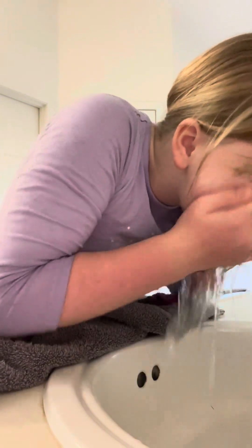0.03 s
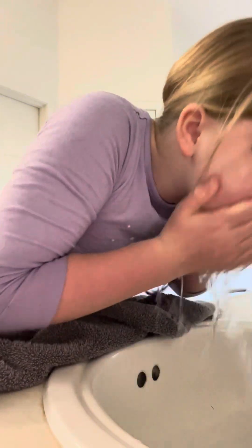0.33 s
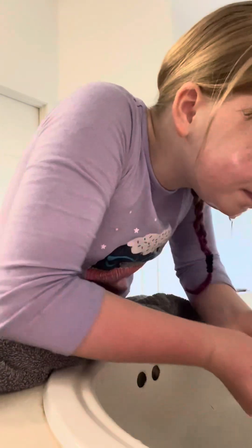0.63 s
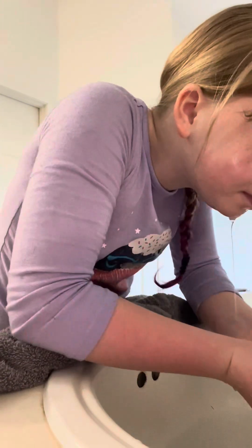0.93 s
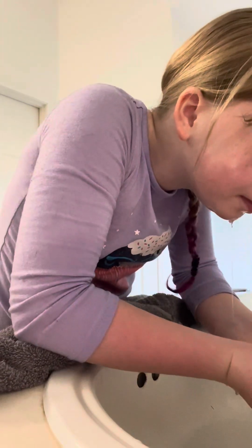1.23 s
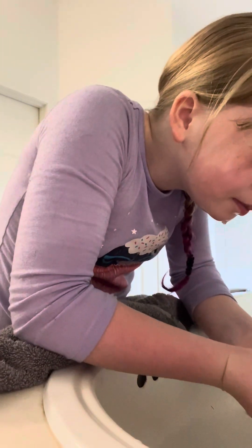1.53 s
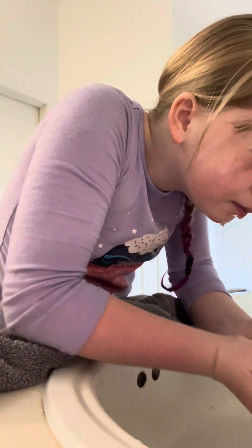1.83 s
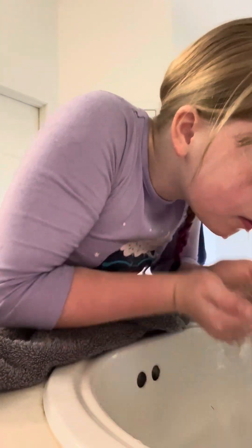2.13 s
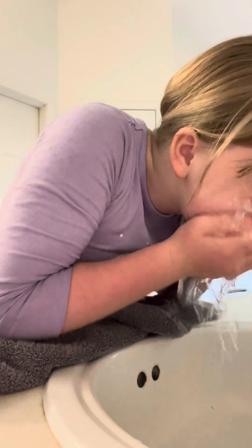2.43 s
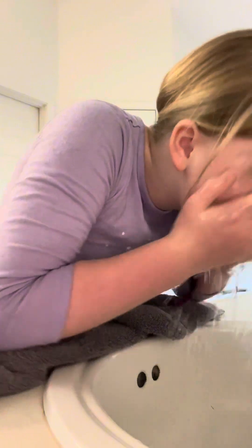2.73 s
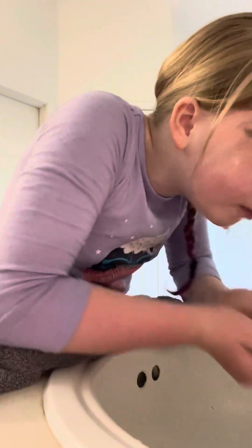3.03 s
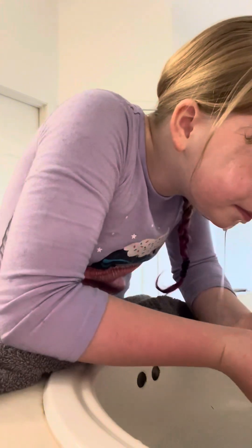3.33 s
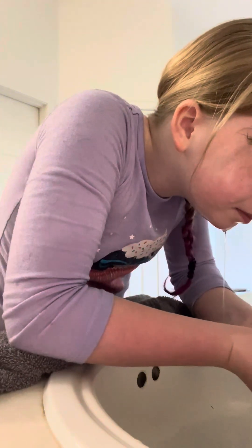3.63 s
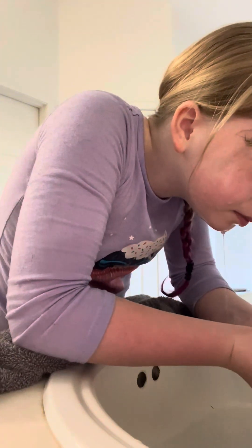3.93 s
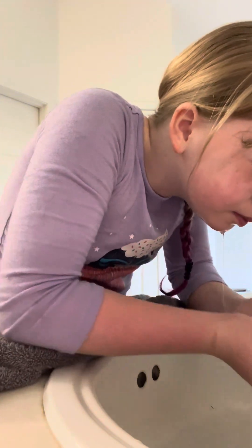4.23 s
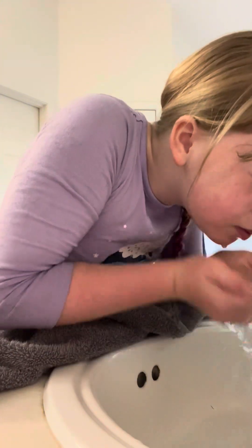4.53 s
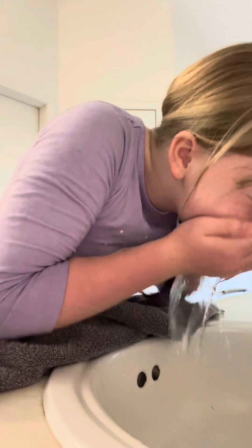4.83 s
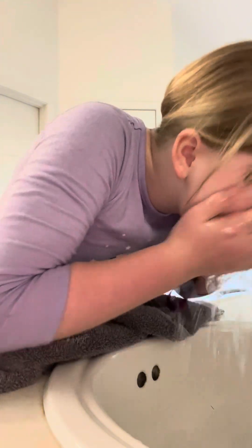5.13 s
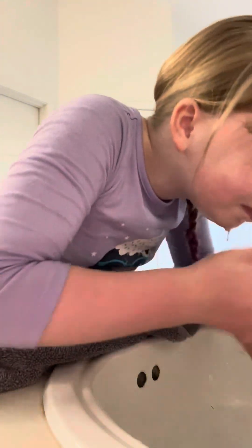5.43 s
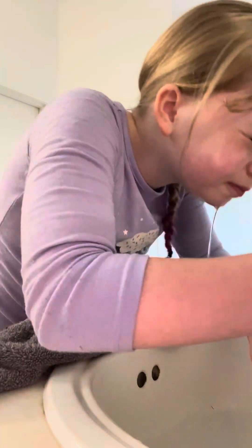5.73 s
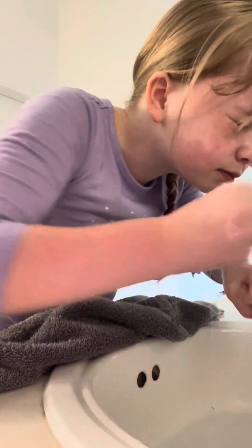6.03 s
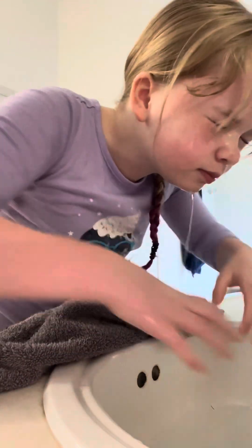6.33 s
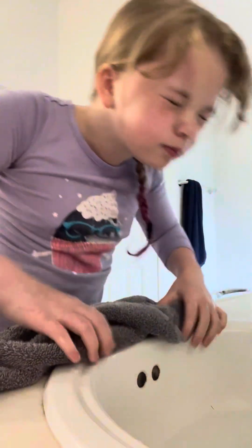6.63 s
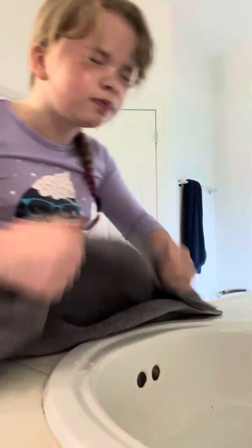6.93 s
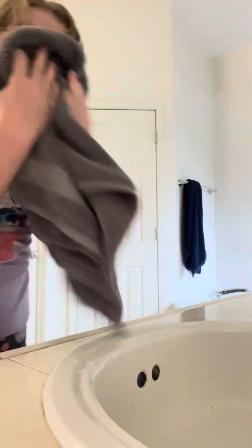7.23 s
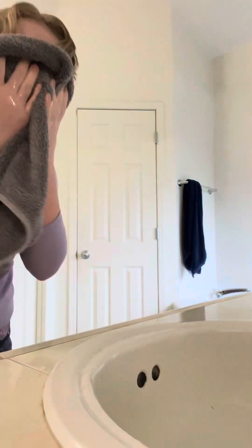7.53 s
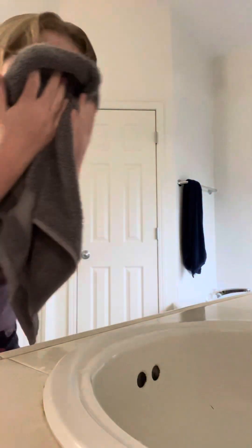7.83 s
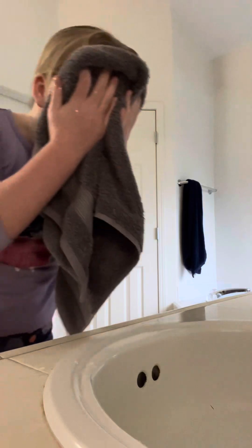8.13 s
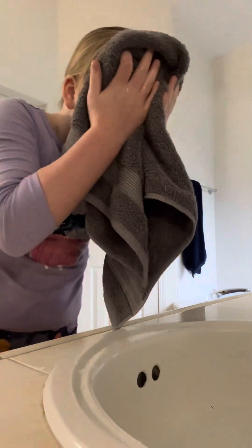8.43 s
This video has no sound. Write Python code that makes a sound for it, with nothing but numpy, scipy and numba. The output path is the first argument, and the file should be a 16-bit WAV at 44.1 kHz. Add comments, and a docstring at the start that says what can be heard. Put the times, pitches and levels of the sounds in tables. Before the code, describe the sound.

A tap runs into a sink as three handfuls of water splash a face, then it shuts off with a thump and a towel rubs.

```python
"""Washing a face at a basin

An aerated tap hisses into a bowl; three handfuls meet a face and fall back as spray and ringing bubbles.
The tap shuts with a heavy thump through the counter, the last water drains and drips, a towel rubs.
Heard from the rim in a small hard room, by two close microphone ports."""
import sys
import numpy as np
from scipy import signal
from scipy.fft import rfft, irfft
from scipy.io import wavfile
from numba import njit

SR = 44100
rng = np.random.default_rng(int(sys.argv[2]) if len(sys.argv) > 2 else 0)


def materialize(psi):
    """Save the field psi as 16-bit PCM at rate SR to the path in sys.argv[1].

    A 1-D psi becomes a single channel; in a 2-D psi each row is a channel.
    """
    bounded = np.clip(np.atleast_2d(psi).T, -1, 1)
    quanta = np.round(bounded * 32767).astype(np.int16)
    wavfile.write(sys.argv[1], SR, quanta)


N = 377937
TIME, HZ = np.arange(N) / SR, np.fft.rfftfreq(2 ** 19, 1 / SR)
TAP_SHUT_S, RUN_OFF_S = 5.732, 6.15

# Levels are relative, ahead of each source's gain.
# hands under the jet: under_s, lifted_s, overflow_db, spill_db
FILLS = [(0.599, 1.965, -33.5, -30.5), (3.122, 4.292, -36.5, -32)]
# handfuls falling from the face: centre_s, half_s, level_db, drain_db
SPLASHES = [(0.264, 0.37, -30, -34), (2.693, 0.37, -32, -32.5), (5.1, 0.24, -27, -32.5)]
# clouds of like-sized bubbles: centre_s, length_s, pitch_hz, level_db
SLOSHES = [(0.157, 0.11, 3400, -27.5), (0.288, 0.012, 3810, -25.5), (0.378, 0.037, 1917, -28),
           (2.403, 0.043, 1616, -31), (2.678, 0.051, 3570, -27), (2.839, 0.066, 2106, -24),
           (4.331, 0.015, 1556, -34.5), (4.422, 0.13, 3440, -33.5), (4.962, 0.033, 3400, -28.5),
           (5.253, 0.038, 1578, -26), (5.802, 0.013, 3314, -31.5), (6.16, 0.1, 4250, -51),
           (6.739, 0.052, 4520, -60.5)]
# single bubbles: start_s, level_db, pitch_hz
PLOPS = [(0.048, -11.5, 1580), (0.086, -22.5, 1060), (0.131, -10, 4180), (0.19, -11.5, 687),
         (0.232, -7.5, 1486), (0.316, -5, 4460), (0.347, -12.5, 1120), (0.348, -11.5, 2040),
         (0.376, -16.5, 1447), (0.471, -17, 730), (0.582, -18.5, 3930), (0.779, -16, 3650),
         (1.484, -19.5, 1420), (1.575, -20.5, 692), (1.604, -13, 6650), (1.711, -19, 1040),
         (1.777, -9.5, 4120), (1.81, -21.5, 720), (1.889, -18, 696), (1.965, -18.5, 725),
         (2.018, -9.5, 3700), (2.087, -9.5, 3359), (2.147, -12, 3700), (2.148, -17.5, 1248),
         (2.296, -16, 2070), (2.389, -15.5, 694), (2.401, -12.5, 1740), (2.547, -15.5, 2670),
         (2.613, -9.5, 1753), (2.676, -9, 6600), (2.714, -12.5, 3300), (2.768, -10, 1095),
         (2.807, -12.5, 2080), (2.871, -13, 2010), (2.894, -3.5, 1115), (3.113, -22, 674),
         (3.288, -21.5, 1055), (4.352, -16.5, 6000), (4.387, -19, 694), (4.427, -14, 1480),
         (4.455, -11, 4100), (4.492, -9.5, 5189), (4.866, -18, 1180), (4.925, -8.5, 1450), (4.973, 2, 3800),
         (4.974, -13.5, 1740), (5.052, -11, 1690), (5.09, -12.5, 1480), (5.11, -11, 734),
         (5.134, -13, 4100), (5.193, -15.5, 860), (5.233, -10.5, 6280), (5.258, -10.5, 1096),
         (5.743, -14, 1073), (5.775, -17, 2210)]  # large drops
GLUGS = [(0.056, -20, 474), (0.203, -26, 409), (0.498, -23, 474), (0.611, -21.5, 418), (2.197, -17.5, 411),
         (2.3, -21.5, 415), (2.345, -21.5, 427), (2.398, -24.5, 428), (2.503, -24.5, 456),
         (2.586, -24, 410), (2.627, -19.5, 410), (2.682, -25, 417), (2.913, -24.5, 435), (2.975, -17, 400),
         (3.029, -26, 406), (4.441, -17, 421), (4.479, -19, 415), (4.549, -23, 400), (4.572, -20.5, 406),
         (4.696, -21.5, 339), (4.722, -20, 416), (4.874, -21.5, 389), (4.923, -22.5, 395),
         (4.956, -15.5, 410), (5.06, -21, 468), (5.126, -20.5, 391), (5.16, -20.5, 432),
         (5.195, -16.5, 417), (5.25, -21, 463), (5.309, -22.5, 412), (5.347, -20, 408), (5.571, -21.5, 402),
         (5.595, -17.5, 419), (5.662, -15.5, 412)]  # in the drain
DRIPS = [(5.9075, -26.5, 1440), (5.925, -34, 5600), (5.9998, -29, 4240), (6.021, -29, 3770),
         (6.0412, -27, 2820), (6.056, -33.5, 2220), (6.0651, -28.5, 1375), (6.0911, -26.5, 1504),
         (6.134, -40, 4350), (6.162, -36.5, 3480), (6.2098, -25.5, 5600), (6.2287, -37, 1160),
         (6.7131, -42, 5380), (6.7775, -35, 2840)]  # after the tap shuts
# fine droplets on porcelain: start_s, level_db
SPATTERS = [(5.9424, -35), (5.9914, -29), (6.0282, -35), (6.0412, -45.5), (6.147, -40), (6.1894, -46),
            (6.2088, -41), (6.323, -44), (6.6578, -43), (6.695, -48), (6.7131, -47)]
# dull knocks on the counter, the loudest is the tap shutting: start_s, level_db, pitch_ratio
KNOCKS = [(5.615, -23.5, 0.76), (5.754, -4, 1), (6.916, -36.5, .9), (7.039, -44.5, .8), (7.143, -51, 0.92),
          (7.9, -47.5, 0.58)]
# counter modes: pitch_hz, level_db, t60_s
COUNTER_MODES = [(88.7, 12.5, 0.083), (91.7, -17, 0.46), (63.6, -11.5, 0.39), (138.3, -16, 0.4),
                 (230, -30, 0.21), (340, -30, 0.3), (491, -32.5, 0.39)]
# wet hands and towel sliding: start_s, end_s, body_db, fibre_db, shake_db
RUBS = [(6.248, 6.507, -110, -110, -50), (6.523, 6.866, -73, -73, -72), (6.837, 7.164, -67.5, -74.5, -57.5),
        (7.165, 7.348, -81, -78, -80), (7.337, 7.466, -72, -66.5, -77), (7.628, 7.918, -79.5, -70.5, -69.5),
        (7.93, 8.343, -70, -84.5, -60)]
# towel catching: centre_s, half_s, gain_db
CATCHES = [(6.59, 0.02, 5), (6.972, 0.012, 8), (7.02, 0.014, 1), (8.25, 0.025, 3)]
# bowl resonances: centre_hz, width_hz, jet_left_db, jet_right_db, splash_left_db, splash_right_db
BOWL_MODES = [(230, 10, 5, 10, -1, 3.5), (386, 170, 0.5, 7.5, -3.5, 8), (461, 13, 3.5, 3.5, 6.5, 4),
              (582.5, 80, -9.5, -11, -5.5, -10.5), (710, 350, 6.5, 2.5, 5, 2), (958, 38, -11, -6, -5.5, -2),
              (1062, 130, -3, 1.5, -2.5, 7.5), (1330, 62, -10.5, 4.5, -8.5, -0.5),
              (1469, 62, 0.5, 11, 1, 7), (1650, 66, -5.5, -8, 0.5, 4), (1770, 80, 4.5, 6.5, 4, 2),
              (2074, 97, 2.5, -2, 5, 3), (2440, 360, -6, -5.5, 0.5, -1), (2820, 130, -0.5, 2, -1, -1),
              (3360, 210, 4.5, 2, -0.5, 3), (3770, 98, -4.5, -1.5, 0, 0), (4480, 250, 3, 3.5, -0.5, 2.5)]
# room decay: freq_hz, t60_s
ROOM_DECAY = [(80, 0.14), (300, 0.32), (1500, 0.25), (4000, 0.23), (14000, 0.039)]
# stereo width by frequency, how alike left and right sound: freq_hz, likeness (1 = mono)
STEREO_LIKENESS = [(100, 1), (430, 0.72), (580, 0.11), (740, 0.88), (1100, 0.88), (1650, 0.46),
                   (2100, 0.18), (2470, 0.29), (2900, 0.26), (4500, 0.45), (5100, 0.12), (6500, 0.44),
                   (8000, 1), (9400, 1), (10800, 0.41), (12500, 1)]
# phase between left and right: freq_hz, left_lead_rad
STEREO_PHASE = [(0, 0), (520, 0.2), (780, -1.0), (1210, -1.7), (1720, -10.8), (1980, -13.2), (2930, -18.5),
                (3530, -19.6), (4310, -19.0), (6630, -17.5), (7100, -17.1), (7700, -15.8), (9560, -15.7),
                (11800, -12.7), (16100, -12.4)]
# balance of a single bubble: pitch_hz, left_minus_right_db
BUBBLE_PAN = [(400, -9), (720, 2.5), (1120, -10), (1500, -8), (1800, 0.5), (3800, 3), (5000, -0.5)]
# source spectra: freq_hz, density_db
QUIET_TONE = [(20, -20), (80, 4), (200, -14), (600, -21), (3000, -29.5), (15000, -42)]
RUMBLE_TONE = [(20, -40.5), (50, -1), (85, -6.5), (150, -6), (230, -12.5), (400, -24), (550, -43.5),
               (900, -57)]
CLOTH_TONE = [(100, -2), (430, -1.5), (750, 1), (1400, -2), (2800, -7.5), (8000, -29)]
FIBRE_TONE = [(800, -2.5), (1700, 6), (2400, 3.5), (3100, 3), (5000, -1), (7000, -2.5), (8500, -14),
              (11000, -6.5), (15500, -28)]
RIM_TONE = [(200, 3), (700, 3), (3000, 2), (4500, -13), (12000, -28)]
SPATTER_TONE = [(2000, -27), (6000, -15.5), (10000, 7), (13000, -1.5), (15500, -9.5)]
SLAP_TONE = [(100, -8), (600, 1.5), (1500, 4), (4200, -1), (7000, -0.5), (15000, -20)]
DRIBBLE_TONE = [(400, -21.5), (1500, -2.5), (2400, -3.5), (4000, -8), (7000, -9), (11000, 0.5),
                (15500, -14.5)]
FOAM_TONE = [(1000, -22), (2500, -14), (3600, 0), (7000, -1), (11000, -4.5), (15500, -11.5)]
DRUM_TONE = [(25, -37), (55, -6), (95, -2), (150, -4.5), (280, -14), (430, -7), (600, -15), (1000, -28)]
THUD_TONE = [(60, -14), (150, -10.5), (225, 1), (300, -7.5), (600, -35.5)]
JET_TONE = [(30, -20.5), (100, -0.5), (250, -11), (450, -20), (800, -9), (1400, -4.5), (2000, -5),
            (2430, -5), (3000, -6), (5500, -7), (7000, -4.5), (7900, -9.5), (10700, -2.5), (13000, -11),
            (15500, -14)]
FALL_TONE = [(200, -18.5), (500, -5), (800, -2), (1500, -3.5), (2500, -5), (3800, -7), (5500, -8),
             (8000, -9), (10700, -10.5), (15500, -19)]


def amp(db):
    """Decibels to gain."""
    return 10 ** (np.asarray(db) / 20)


def unit(x):
    """Scales to rms 1."""
    return x / np.sqrt(np.mean(x ** 2) + 1e-20)


def read(points, hz):
    """Interpolates on a log-frequency axis."""
    freq_hz, value = np.transpose(points)
    return np.interp(np.log(hz + 1), np.log(freq_hz + 1), value)


def add(mix, start_s, sound):
    """Mixes in place."""
    part = mix[max(round(start_s * SR), 0):][:len(sound)]
    part += sound[:len(part)]


def through(x, response):
    """Filters by a complex response over HZ."""
    return irfft(rfft(x, 2 * len(HZ) - 2) * response)[..., :N]


def causal(gain_db):
    """Minimum-phase response: no ringing ahead of a click."""
    cepstrum = irfft(gain_db * np.log(10) / 20)
    return np.exp(rfft(cepstrum * (1 + np.sign(np.fft.fftfreq(cepstrum.shape[-1])))))


def coloured(x, tone):
    """Applies a spectrum, at rms 1."""
    return unit(through(x, causal(read(tone, HZ))))


def noise():
    """Two white noises: stereo mid and side."""
    return rng.standard_normal((2, N))


def lumps(rate_hz, depth_db):
    """Bounded random gain."""
    wander = unit(through(rng.standard_normal(N), 1 / (1 + (HZ / rate_hz) ** 2)))
    return amp(depth_db * 2 * np.tanh(.5 * wander))


def fading(end_s, t60_s):
    """1 until end_s, then exponential decay."""
    return amp(-60 * np.maximum(TIME - end_s, 0) / t60_s)


def held(start_s, end_s, rise_s, t60_s):
    """Attack, hold, release."""
    return np.clip((TIME - start_s) / rise_s, 0, 1) * fading(end_s, t60_s)


def swell(centre_s, half_s):
    """Gaussian envelope."""
    return np.exp(-((TIME - centre_s) / half_s) ** 2)


def patter(spread_db, density):
    """Random ticks of uneven size."""
    size = amp(spread_db * np.minimum(rng.exponential(1, (2, N)), 5))
    return unit(size * noise() * (rng.random((2, N)) < density))


def impacts(hits, tone, decay_s, rise_s):
    """A noise puff per hit: start_s, level_db."""
    level, t = np.zeros(N), np.arange(SR // 8) / SR
    for start_s, db, *_ in hits:
        add(level, start_s, amp(db) * np.exp(-t / decay_s) * (1 - np.exp(-t / rise_s)))
    return level * coloured(noise(), tone)


@njit
def ring(start, size, cycles_per_sample, life_samples, glide, length):
    """Sums decaying sines of rising pitch."""
    out = np.zeros(length)
    for k in range(len(start)):
        phase, fade, step = 0., size[k], np.exp(-1 / life_samples[k])
        for i in range(min(int(5 * life_samples[k]), length - start[k])):
            phase += 2 * np.pi * cycles_per_sample[k] * (1 + glide * i / life_samples[k])
            fade *= step
            out[start[k] + i] += fade * np.sin(phase)
    return out


def bubbles(low_hz, high_hz, cycles, spread_db, glide, count):
    """Two bubble swarms, even in power over the band; cycles is the mean life at 1 kHz."""
    when, pitch, size, damping = rng.random((2 * count, 4)).T
    hz = (np.sqrt(low_hz) + pitch * (np.sqrt(high_hz) - np.sqrt(low_hz))) ** 2
    life_samples = cycles * (.5 + damping) * SR / hz * np.sqrt(hz / 1000)
    size = amp(spread_db * np.minimum(-np.log(1 - size), 4)) * np.sqrt(np.sqrt(hz) / life_samples)
    start = (when * 2 * N).astype(np.int64)
    return unit(ring(start, size, hz / SR, life_samples, glide, 2 * N).reshape(2, N))


def room(x):
    """Sparse reflections per port, each band with its own decay."""
    reflections = rng.standard_normal((2, SR)) * (rng.random((2, SR)) < .1)
    reflections[:, :SR // 200] = 0
    hz, t, bands = signal.stft(reflections, SR, nperseg=256)
    tail = signal.istft(bands * amp(-60 * t / read(ROOM_DECAY, hz)[:, None]), SR, nperseg=256)[1]
    return signal.fftconvolve(x[None], tail / np.linalg.norm(tail[0]), axes=1)[:, :N]


def stereo(pair):
    """Mid and side to left and right; width varies with frequency."""
    likeness = np.clip(read(STEREO_LIKENESS, HZ), -1, 1)
    mid, side = through(pair, np.sqrt([(1 + likeness) / 2, (1 - likeness) / 2]))
    return np.array([mid + side, mid - side])


def basin(pair, left_column):
    """Room echo, then bowl resonances; their gains depend on where the water lands."""
    lift_db = 0
    for mode in BOWL_MODES:
        centre_hz, width_hz = mode[:2]
        sides_db = np.array(mode[left_column:left_column + 2])[:, None]
        lift_db += sides_db / (1 + (2 * (HZ - centre_hz) / width_hz) ** 2)
    return through(stereo(pair + amp(-11.5) * room(pair[0])), causal(lift_db))


def panned(x):
    """A single bubble reaches the ports unequally, by pitch."""
    side_db = read(BUBBLE_PAN, HZ)
    return through(x, amp([side_db / 2, -side_db / 2]))


def room_tone():
    """Faint, low, steady noise."""
    return amp(-71.5) * coloured(noise(), QUIET_TONE)


def rubbing(column):
    """Envelope of all rubs, from one level column."""
    return sum(amp(rub[column]) * held(rub[0], rub[1], rise_s=.085, t60_s=.305) for rub in RUBS)


def counter_rumble():
    """Dull shaking after each knock and under each rub."""
    shaken = sum(amp(db) * held(s, s, rise_s=.0087, t60_s=1.47) for s, db, _ in KNOCKS)
    return amp(-6) * (amp(-16) * shaken + rubbing(column=4)) * coloured(noise(), RUMBLE_TONE)


def towel():
    """Cloth slides: loops catch and let go, folds shift its colour."""
    folds = 0
    for hz in (420, 750, 1000, 2200):
        band = 1 / (1 + (3 * (HZ - hz) / hz) ** 2)
        folds += lumps(9, depth_db=2.5) * through(noise(), band) / np.sqrt(hz)
    scratch = unit(lumps(45, depth_db=2) * patter(spread_db=2, density=.05))
    caught = amp(sum(db * swell(s, half_s) for s, half_s, db in CATCHES))
    body = rubbing(column=2) * caught * coloured(unit(folds) + .5 * scratch, CLOTH_TONE)
    fibres = rubbing(column=3) * coloured(noise() + scratch, FIBRE_TONE)
    return amp(2.5) * body + amp(4) * fibres


def rim_tap(start_s=6.534, level_db=-48):
    """A finger meets the rim."""
    return impacts([(start_s, level_db)], RIM_TONE, decay_s=.006, rise_s=.00055)


def basin_ping(start_s=6.7775, pitch_hz=2815):
    """The last drip rings one mode of the basin."""
    return amp(-51) * held(start_s, start_s, rise_s=.002, t60_s=.5) * np.sin(2 * np.pi * pitch_hz * TIME)


def counter_knocks():
    """Soft, heavy pushes set the counter's modes swinging."""
    out, t = np.zeros(N), np.arange(SR // 2) / SR
    for start_s, db, pitch_ratio in KNOCKS:
        modes = sum(amp(mode_db - 60 * t / t60_s) * np.sin(2 * np.pi * hz * pitch_ratio * t)
                    for hz, mode_db, t60_s in COUNTER_MODES)
        swing = modes * (1 - np.exp(-(t / .02) ** 2))
        add(out, start_s, amp(db) * swing / abs(swing).max())
    return out


def dribble():
    """The shut tap's stream breaks into droplets; foam fizzes out."""
    droplets = patter(spread_db=3.5, density=.008)
    droplets += bubbles(1200, 11000, cycles=5, spread_db=2.5, glide=.018, count=1600)
    flow = held(TAP_SHUT_S, RUN_OFF_S + .051, rise_s=.068, t60_s=.27) * lumps(22.03, depth_db=.5)
    stream = amp(-54) * flow * coloured(droplets, DRIBBLE_TONE)
    foam = coloured(noise() + patter(spread_db=3, density=.02), FOAM_TONE)
    return stream + amp(-58) * held(TAP_SHUT_S, RUN_OFF_S, rise_s=.37, t60_s=3.5) * foam


def single_bubbles(rows, t60_s, glide, rise_s):
    """Trapped bubbles ring and rise in pitch; t60_s holds at 1 kHz, smaller ones die sooner."""
    out, t = np.zeros(N), np.arange(SR // 8) / SR
    for start_s, db, hz in rows:
        age = t / t60_s * np.sqrt(hz / 1000)
        bubble = np.sin(2 * np.pi * hz * t * (1 + glide * age)) * amp(-60 * age)
        add(out, start_s, amp(db) * bubble * (1 - np.exp(-t / rise_s)))
    return out


def cupped(lag_s, ease_s):
    """1 while the hands catch the jet, 0 from lag_s after the lift."""
    return sum(np.clip(np.minimum(TIME - under_s, lifted_s + lag_s - TIME) / ease_s, 0, 1)
               for under_s, lifted_s, _, _ in FILLS)


def overflow(growth_db_per_s):
    """Envelope: more water runs over as the hands fill."""
    return sum(amp(db + growth_db_per_s * np.minimum(TIME - lifted_s, 0))
               * held(under_s, lifted_s, rise_s=.043, t60_s=1) for under_s, lifted_s, db, _ in FILLS)


def falling():
    """Envelope: splashes, spills on lifting, overflow and run-off, summed in power."""
    splashes = [amp(db) * swell(s, half_s) for s, half_s, db, _ in SPLASHES]
    spills = [amp(db) * swell(lifted_s + .2, half_s=.16) for _, lifted_s, _, db in FILLS]
    run_off = amp(-34) * (1 - cupped(lag_s=.044, ease_s=.031))
    flow = np.linalg.norm(splashes + spills + [overflow(growth_db_per_s=7), run_off], axis=0)
    return flow * fading(TAP_SHUT_S + .0612, t60_s=.85) * fading(RUN_OFF_S, t60_s=.18)


def drain_and_bowl():
    """Water past the hands bubbles in the drain and drums on the bowl; one sheet lands flat."""
    gurgle = bubbles(360, 510, cycles=5.5, spread_db=1.5, glide=.02, count=700)
    centre_s, _, _, drain_db = np.transpose(SPLASHES)
    drain = amp(np.interp(TIME, centre_s, drain_db)) * (1 - cupped(lag_s=.15, ease_s=.031))
    drain += amp(-7) * overflow(growth_db_per_s=12.5)
    drain *= fading(TAP_SHUT_S + .11, t60_s=1)
    push = amp(-10.5) * drain + amp(-21.5) * falling() * (1 - cupped(lag_s=-.21, ease_s=.06))
    thud = amp(-35) * swell(2.42, half_s=.069) * coloured(noise(), THUD_TONE)
    return amp(-17) * drain * gurgle + push * coloured(noise(), DRUM_TONE) + thud


def hand_pool():
    """The jet drives like-sized bubbles into the cupped water."""
    swarm = bubbles(1509, 2100, cycles=8.3, spread_db=-3, glide=.0145, count=2500)
    return amp(-41) * cupped(lag_s=.021, ease_s=.34) * swarm


def jet():
    """Aerated jet: a hiss of tiny bubbles, louder amid splashes and off the lifting fingers."""
    fizz = bubbles(600, 15000, cycles=3, spread_db=2.6, glide=.01, count=30000)
    spray = coloured(amp(3.5) * noise() + fizz, JET_TONE)
    bare_bowl_db = -.5 * (1 - cupped(lag_s=.0092, ease_s=.046))
    splash_db = 4 * sum(swell(s, half_s) for s, half_s, _, _ in SPLASHES)
    graze_db = 4 * sum(swell(lifted_s + .085, half_s=.056) for _, lifted_s, _, _ in FILLS)
    level = amp(-34.5 + bare_bowl_db + splash_db + graze_db)
    return level * fading(TAP_SHUT_S, t60_s=.047) * lumps(20, depth_db=1.58) * spray


def sloshes():
    """Landing water whips up brief bubble clouds, each around one pitch."""
    out = np.zeros((2, N))
    swarm = bubbles(900, 6000, cycles=9, spread_db=4.5, glide=.026, count=14000)
    for centre_s, length_s, hz, db in SLOSHES:
        span = slice(round((centre_s - length_s) * SR), round((centre_s + length_s) * SR))
        band = signal.butter(1, [hz / 1.25, hz * 1.25], "band", fs=SR, output="sos")
        cloud = unit(signal.sosfilt(band, swarm[:, span]))
        out[:, span] += amp(db) * cloud * swell(centre_s, length_s / 2)[span]
    return out


def falling_water():
    """Sheets break into a lumpy stream of bubbles, ringing droplets and spray."""
    swarm = bubbles(550, 6500, cycles=5, spread_db=2.6, glide=.02, count=6500)
    droplets = bubbles(1100, 7000, cycles=9, spread_db=2.4, glide=.012, count=1600)
    water = lumps(31, depth_db=3.2) * (swarm + amp(-1) * droplets + amp(-8) * noise())
    return amp(-4.5) * falling() * coloured(water, FALL_TONE)


def scene():
    """Water in bowl and room, plus counter and towel, in stereo."""
    slaps = amp(-13.5) * impacts(PLOPS, SLAP_TONE, decay_s=.006, rise_s=.002)
    slaps += amp(-12) * impacts(DRIPS, SLAP_TONE, decay_s=.002, rise_s=.0005)
    spatter = impacts(SPATTERS, SPATTER_TONE, decay_s=.0021, rise_s=.0004)
    plops = amp(-5) * single_bubbles(PLOPS, t60_s=.036, glide=.11, rise_s=.0018)
    plops *= lumps(300, depth_db=1.2)
    glugs = amp(-.5) * single_bubbles(GLUGS, t60_s=.05, glide=.04, rise_s=.004)
    glugs *= lumps(90, depth_db=1.5)
    drips = amp(-4) * single_bubbles(DRIPS, t60_s=.033, glide=.1, rise_s=.0005)
    drips *= lumps(300, depth_db=2)
    thump = counter_knocks()
    # the thump travels mostly through the counter: little echo
    echo = room(amp(-15) * (plops + glugs) + amp(-7.5) * drips + amp(-21) * thump)
    splashing = falling_water() + sloshes() + drain_and_bowl() + dribble() + slaps + spatter + echo
    background = counter_rumble() + towel() + rim_tap() + room_tone()
    water = basin(jet() + hand_pool(), left_column=2) + basin(splashing, left_column=4)
    left, right = water + stereo(background)
    right = through(right, np.exp(-1j * read(STEREO_PHASE, HZ)))
    direct = panned(plops + drips + glugs) + basin_ping() + thump * amp([[-.5], [.5]])
    return np.array([left, right]) + direct


def record(dry, low_hz=45, high_hz=15780):
    """Small microphone: bass roll-off, then band limit."""
    thin = signal.sosfilt(signal.butter(3, low_hz, "high", fs=SR, output="sos"), dry)
    lowpass = signal.firwin(511, high_hz, window=("kaiser", 9), fs=SR)
    return signal.oaconvolve(thin, lowpass[None], "same")


dry = scene()
out = record(dry)
materialize(out)
```